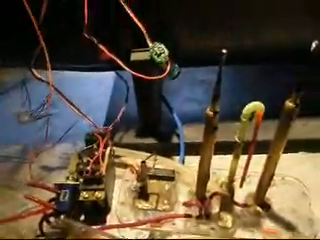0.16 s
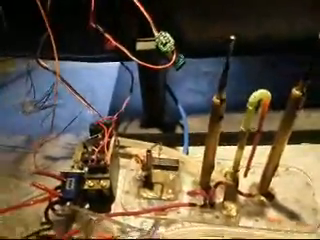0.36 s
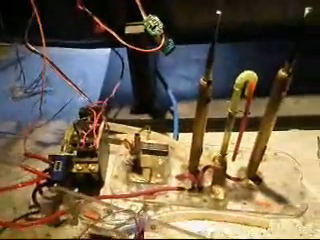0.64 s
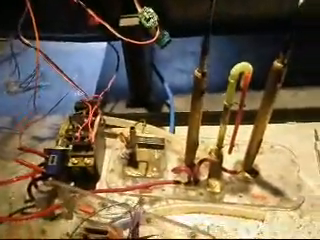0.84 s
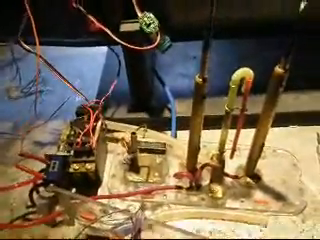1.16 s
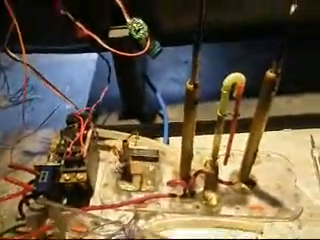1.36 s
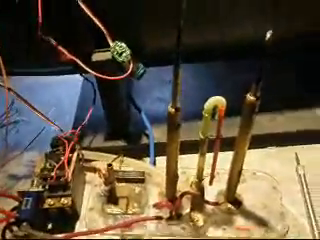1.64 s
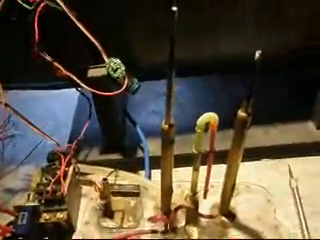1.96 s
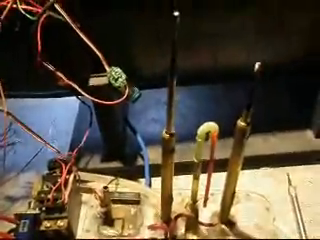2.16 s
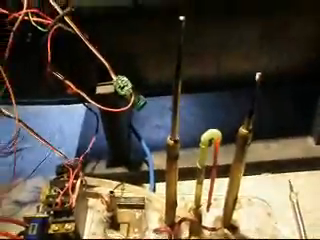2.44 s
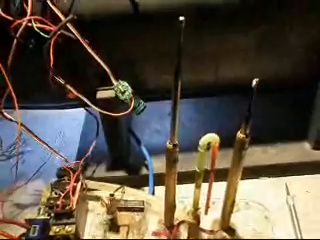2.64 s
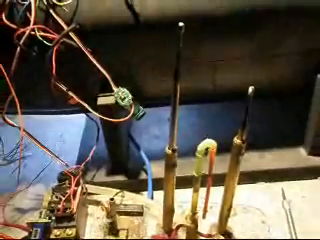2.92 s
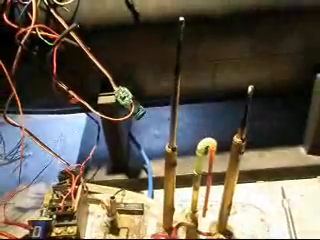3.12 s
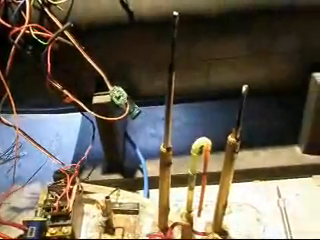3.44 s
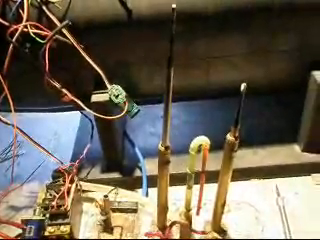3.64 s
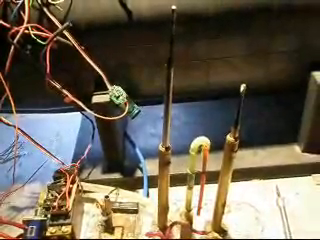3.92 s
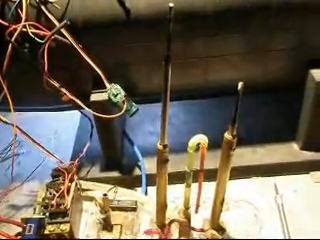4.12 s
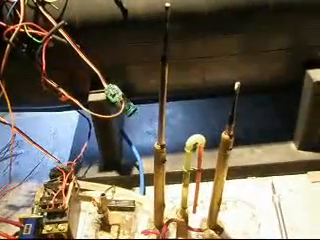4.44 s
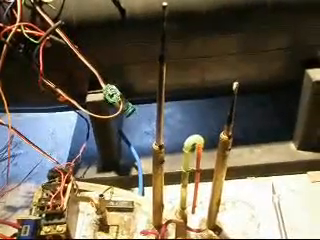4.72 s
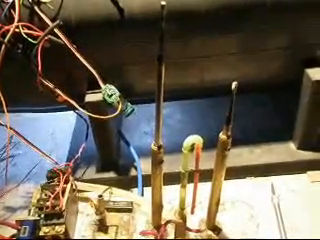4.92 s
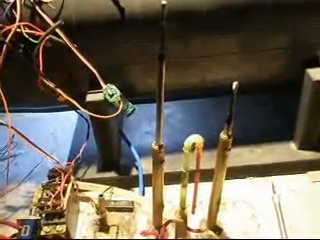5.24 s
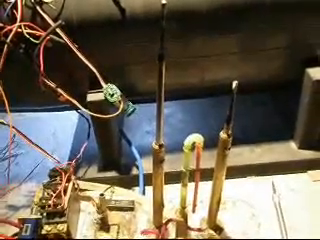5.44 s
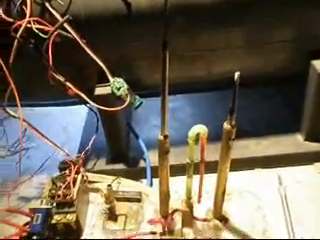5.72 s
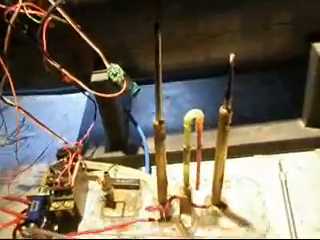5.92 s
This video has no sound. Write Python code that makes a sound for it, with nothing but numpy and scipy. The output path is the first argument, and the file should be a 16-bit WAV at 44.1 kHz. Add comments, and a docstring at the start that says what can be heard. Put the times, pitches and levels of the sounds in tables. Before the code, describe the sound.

Faint room air and gritty hiss open the sound. At about 0.8 seconds a small electric air compressor switches on with a quick cluster of knocks and a burst of rattle, reaching speed almost at once. It holds a steady, buzzing whine at a medium-low pitch, with loose parts chattering along. Short fits of harder rattling come and go between about 1.3 and 4 seconds. From around 2.5 seconds the pitch sags slightly and wavers, and the buzz changes tone as the load builds. At about 5.9 seconds the motor cuts off with a knock and a very brief high squeak, dying away quickly, followed by one small tick just after 6 seconds. The microphone is close to the bench in a small workshop with only a short echo. The sound is mono and telephone-like, with a grainy treble.

```python
"""Air compressor on a workbench

One microphone in a small workshop, close to the bench; the walls ring only briefly. A small electric
compressor is switched on, whines for five seconds and is cut off with a knock and a squeak. Its speed
sags and its buzz changes colour as the load builds; loose parts rattle with the strokes.
A telephone-grade recorder holds each sample, which adds a gritty treble."""
import sys
import numpy as np
from scipy import signal
from scipy.fft import rfft, irfft, next_fast_len
from scipy.io import wavfile
from scipy.ndimage import uniform_filter1d, map_coordinates

SR = 44100
rng = np.random.default_rng(int(sys.argv[2]) if len(sys.argv) > 2 else 0)


def master(y):
    """Save y as 16-bit WAV."""
    cut = np.clip(np.atleast_2d(y).T, -1, 1)
    pcm = np.round(cut * 32767)  # scale
    wavfile.write(sys.argv[1], SR, pcm.astype(np.int16))


N = 267944
ON_S, OFF_S = 0.779, 5.868  # the motor is switched on and cut off
HOLD_HZ = 8000  # the recorder's sample rate


def undb(db):
    """Decibels to gain."""
    return 10 ** (np.asarray(db) / 20)


def unit(x):
    """Scale to an rms of 1."""
    return x / np.sqrt(np.mean(x ** 2))


def curve(table):
    """A table of times and values, drawn out to one value per sample."""
    return np.interp(np.arange(N) / SR, *np.transpose(table))


def swell(at_s, half_s):
    """A smooth bump of height 1 around a moment."""
    return np.exp(-((np.arange(N) / SR - at_s) / half_s) ** 2)


def wander(hz):
    """A smooth random curve of rms 1 that moves at up to about hz."""
    lowpass = signal.butter(2, hz, fs=SR / 20, output="sos")
    steps = signal.sosfilt(lowpass, rng.standard_normal(N // 20 + 2))
    return np.interp(np.arange(N) / 20, np.arange(len(steps)), unit(steps))


def colour(x, spectrum):
    """Shape x by a table of frequencies and levels inside the recorder's band; rms 1."""
    hz, db = np.transpose(spectrum)
    size = next_fast_len(N, True)
    bins_hz = np.maximum(np.fft.rfftfreq(size, 1 / SR), 1)
    gain = undb(np.interp(np.log(bins_hz), np.log(hz), db)) * (bins_hz < HOLD_HZ / 2)
    return unit(irfft(rfft(x, size) * gain, size)[:N])


# Room tone of the workshop: frequency_hz, level_db
AIR_SPECTRUM = [(20, -1.5), (110, -15.5), (170, 3.5), (300, 4), (600, 1), (1000, -3), (2000, -5.5),
                (3900, -16.5)]


def workshop_air(level_db=-54.5):
    """Still air around the microphone: a faint, steady, low rush."""
    return undb(level_db) * colour(rng.standard_normal(N), AIR_SPECTRUM)


# Speed of the motor under power: time_s, stroke_rate_hz
MOTOR_SPEED = [(0.85, 266.6), (1.25, 263.4), (2.0, 263.2), (2.4, 261), (2.86, 259.6), (2.95, 254.7),
               (3.03, 257.8), (3.2, 262.4), (3.28, 254.3), (3.36, 263.1), (3.55, 256.2), (3.63, 256.9),
               (4.28, 256.7), (4.39, 252), (4.6, 255.1), (5.0, 253), (5.55, 250.2), (5.86, 253.3)]


def motor_speed(hunt, hunt_hz=1.0):
    """The powered motor slows as the load builds, and hunts a little around that speed."""
    return curve(MOTOR_SPEED) + hunt_hz * hunt


# Load on the pump as the pressure builds: time_s, load_fraction
PUMP_LOAD = [(0.85, 0.14), (2.0, 0.01), (2.42, 0.16), (2.86, 0.35), (2.94, 0.76), (3.38, 0.36),
             (3.62, 0.84), (3.95, 0.68), (4.27, 0.65), (4.39, 0.83), (5.0, 0.84)]


def pump_load(hunt, easing=0.075):
    """The load eases whenever the speed hunts upward."""
    return np.clip(curve(PUMP_LOAD) - easing * hunt, 0, 1)


# Partials of one pump stroke: harmonic_number, free_running_db, half_load_db, full_load_db
STROKE_PARTIALS = [(1, -35, -31, -31.5), (2, -43.5, -32.5, -40), (3, -31.5, -41, -33),
                   (4, -35.5, -33, -41.5), (5, -40.5, -44, -39), (6, -37, -39, -35), (7, -30.5, -27, -32),
                   (8, -42.5, -35, -38.5), (9, -34.5, -28, -42), (10, -30.5, -38.5, -26.5),
                   (11, -51.5, -57, -45), (12, -40.5, -37, -30.5), (13, -35, -48.5, -41.5),
                   (14, -29, -34, -30.5), (15, -64, -45, -47.5)]


def buzz(turns, load, shake, rough, flutter_hz=52, drift=0.098, smear_rad=2.9, breakup_db=0.43):
    """The load recolours the pump's partials; the high ones vary most from stroke to stroke."""
    first_half, second_half = np.minimum(2 * load, 1), np.maximum(2 * load - 1, 0)
    angle = 2 * np.pi * (turns % 1)
    out = 0
    for order, free_db, half_db, full_db in STROKE_PARTIALS:
        free, half, full = undb([free_db, half_db, full_db])
        size = free + (half - free) * first_half + (full - half) * second_half
        size = size * undb(-breakup_db * order * shake)  # shaking breaks up the high partials first
        unsteady = np.tanh(order / 7) ** 1.5
        # the casing scatters the partials in time, so each stroke is a knock with a short clatter
        phase = order * angle - smear_rad * rng.uniform(-1.1, 1)
        strength = 1 + unsteady * (rough * wander(flutter_hz) + drift * wander(6.6))
        timing = unsteady * rough * wander(flutter_hz)
        out = out + size * (strength * np.cos(phase) + timing * np.sin(phase))
    return np.sqrt(2) * out


# Colour of the rattling casing: frequency_hz, level_db
CASING_SPECTRUM = [(40, -38), (120, -26), (250, -12), (400, -12), (650, -8), (930, -16), (1150, -13),
                   (1450, -6), (1700, -6), (2150, -1), (2500, -1), (2900, -6), (3250, -10), (3600, -2),
                   (3900, -4)]


def rattle(turns, bite=0.56, lopsided=0.77, scatter_db=-1.5, throb_db=0.8):
    """Loose parts chatter with uneven force at both ends of each stroke, harder at one end."""
    angle = 2 * np.pi * turns
    impacts = np.exp(bite * np.cos(2 * angle) + lopsided * np.cos(angle))
    force = undb(scatter_db * wander(220) + throb_db * wander(12.0))
    return colour(rng.standard_normal(N) * impacts * force, CASING_SPECTRUM)


# Fits of rattling, in which the motor races and the buzz falters: peak_s, extra_rattle_db
RATTLE_FITS = [(1.298, 2), (1.78, 2.5), (2.11, 3.5), (2.43, 4), (2.615, 3.5), (2.894, 4), (3.169, 2.5),
               (3.945, 3), (4.015, 3)]


def compressor(rattle_db=-30.5, roughness=0.255, jitter_hz=1.0, stumble_hz=36):
    """One motor drives the buzz and the rattle; its strokes stumble while the pump shakes."""
    start_hz, spin_up_s, settle_s, attack_s = 190.17, 0.047, 0.047, 0.015
    coast_hz_per_s, coast_db_per_s, coast_s, release_s = 560, -32, 0.076, 0.017
    start_jolt_db, stop_jolt_db, stop_jolt_s = 10.5, 2.5, 0.023
    t = np.arange(N) / SR
    since_on, since_off = np.maximum(t - ON_S, 0), np.maximum(t - OFF_S, 0)
    fit_db = sum(db * swell(peak_s, half_s=0.019) for peak_s, db in RATTLE_FITS)
    hunt = wander(11)
    powered_hz = motor_speed(hunt)
    spun_up = np.minimum(since_on / spin_up_s, 1)
    hz = start_hz + (powered_hz - start_hz) * spun_up - coast_hz_per_s * since_off
    hz += 0.5 * fit_db  # the motor races in each fit
    # the pump shakes on its feet while it starts and stops
    start_shake = np.maximum(1 - (since_on / settle_s) ** 2, 0)
    stop_shake = 0.65 * np.minimum(since_off / stop_jolt_s, 1)
    shake = np.clip(start_shake + stop_shake, 0, 1)
    turns = np.cumsum(hz + (jitter_hz + stumble_hz * shake) * wander(113.6)) / SR
    # more rattle in the fits, above the local mean speed, and as the pump jolts on and off
    mean_hz = uniform_filter1d(powered_hz, int(0.55 * SR))
    racing_db = fit_db + 0.4 * (powered_hz - mean_hz)
    jolt_db = start_jolt_db * start_shake + stop_jolt_db * swell(OFF_S + stop_jolt_s, stop_jolt_s)
    looseness = undb(racing_db + jolt_db)
    # rattling makes the strokes less alike, and racing weakens them
    rough = np.minimum(roughness * looseness, .45)
    whine = undb(-0.33 * racing_db) * buzz(turns, pump_load(hunt), shake, rough)
    chatter = undb(rattle_db) * looseness * rattle(turns)
    attack = np.minimum(since_on / attack_s, 1) ** 2
    # the pump runs on after the cut, fading, then dies away
    release = undb(coast_db_per_s * since_off) * np.exp(-np.maximum(since_off - coast_s, 0) / release_s)
    return attack * release * (whine + chatter)


# Knocks as the pump jolts on and off, and a last small tick: start_s, level_db, pitch_hz, decay_s
JOLT_KNOCKS = [(.7805, -26, 1327, 0.0022), (0.7876, -20, 3370, 0.0071), (.793, -24, 740, 0.01),
               (.807, -20.5, 486, 0.0094), (5.898, -21.5, 2458, 0.0075), (6.07, -28.5, 1286, 0.002)]


def knocks(crack=0.082):
    """Each knock is one quickly damped ring with a crack of noise."""
    out, age = np.zeros(N + SR), np.arange(SR // 10) / SR
    for start_s, level_db, pitch_hz, decay_s in JOLT_KNOCKS:
        ring = np.sin(2 * np.pi * pitch_hz * age) + crack * rng.standard_normal(len(age))
        out[int(start_s * SR):][:len(age)] += undb(level_db) * np.exp(-age / decay_s) * ring
    return out[:N]


# Tones of the stopping pump's squeak: pitch_hz, level_db
SQUEAK_TONES = [(2275, -21.5), (2760, -24)]


def squeak(peak_s=5.888, waver_hz=25):
    """Two wavering tones swell and vanish as the pump stops."""
    tones = 0
    for pitch_hz, level_db in SQUEAK_TONES:
        turns = np.cumsum(pitch_hz + waver_hz * wander(100)) / SR
        tones = tones + undb(level_db) * np.sin(2 * np.pi * turns)
    return swell(peak_s, half_s=0.016) * tones


def bench(x, hz=254, width_hz=10, ring_db=-16):
    """The bench top has one low resonance that hums on after the motor stops."""
    return x + undb(ring_db) * signal.lfilter(*signal.iirpeak(hz, hz / width_hz, fs=SR), x)


def room(x, t60_s=0.47, wet_db=-15):
    """A short diffuse tail from the walls reaches the microphone 6 ms behind the direct sound."""
    t = np.arange(SR // 2) / SR
    tail = rng.standard_normal(len(t)) * np.exp(-np.log(1000) * t / t60_s) * (t > .006)
    return x + undb(wet_db) * signal.fftconvolve(x, tail / np.linalg.norm(tail))[:N]


def scene():
    """At the microphone, in mono: the machine on its bench, the walls behind it, and still air."""
    machine = compressor() + knocks() + squeak()
    return (room(bench(machine)) + workshop_air())[None]


def record(dry):
    """A slow 8-bit recorder: coarse steps add gritty hiss, held samples mirror sound into the treble."""
    saturated = .6 * np.tanh(dry[0] / .6)
    telephone_band = signal.ellip(8, .2, 60, HOLD_HZ / 2, fs=SR, output="sos")
    narrow = signal.sosfilt(telephone_band, saturated)
    hold_positions = np.floor(np.arange(N) * HOLD_HZ / SR) * SR / HOLD_HZ
    held = map_coordinates(narrow, [hold_positions], order=3)
    stepped = (np.floor(held * 128) + .5) / 128
    treble_limit = signal.ellip(12, .2, 80, 12750, fs=SR, output="sos")
    return signal.sosfilt(treble_limit, stepped)[None]


dry = scene()
out = record(dry)
master(out)
```